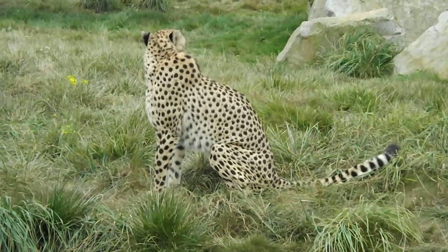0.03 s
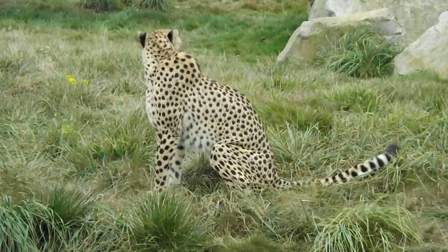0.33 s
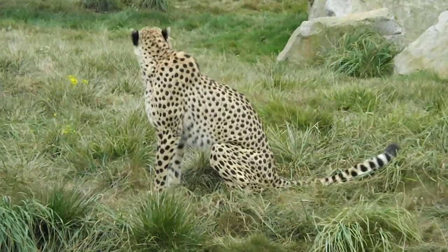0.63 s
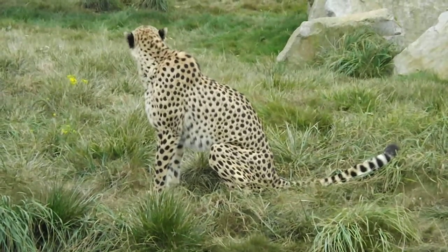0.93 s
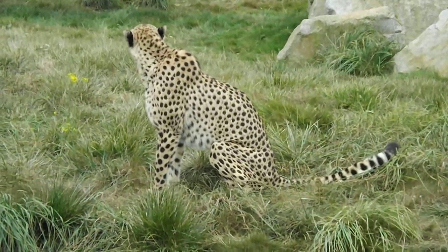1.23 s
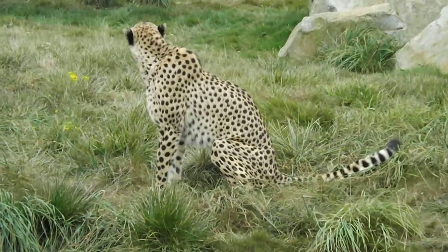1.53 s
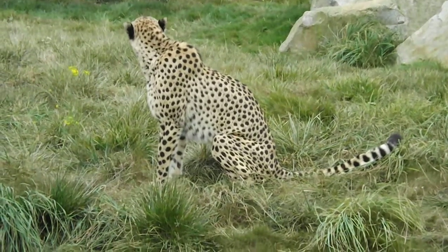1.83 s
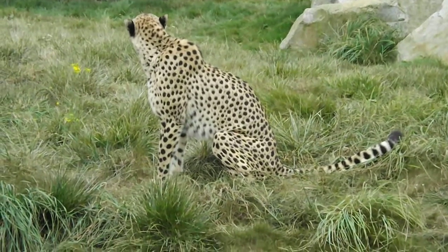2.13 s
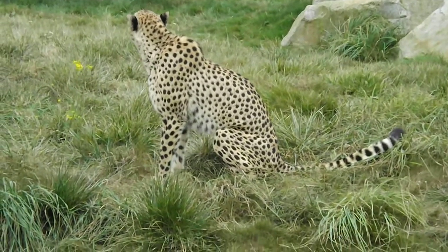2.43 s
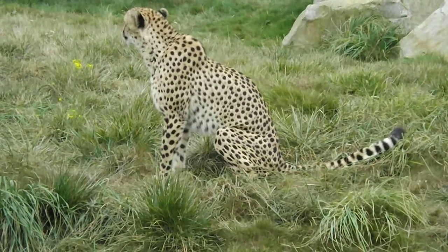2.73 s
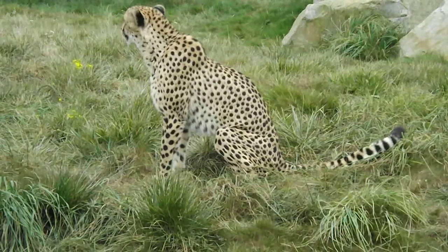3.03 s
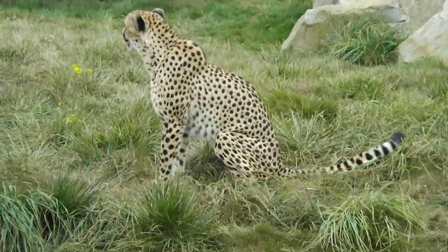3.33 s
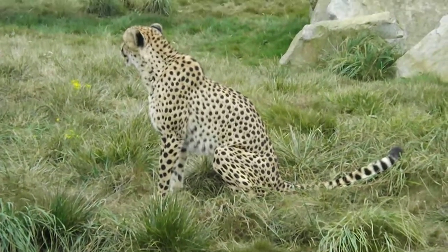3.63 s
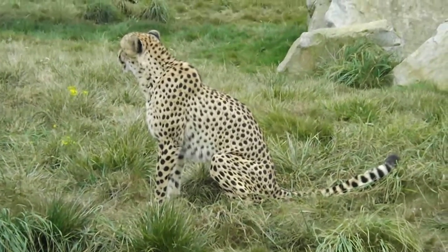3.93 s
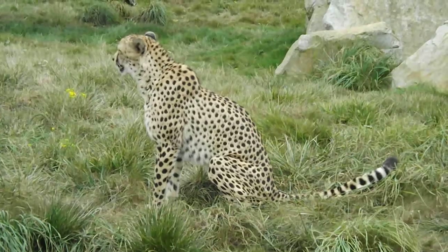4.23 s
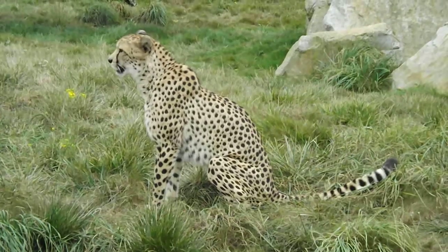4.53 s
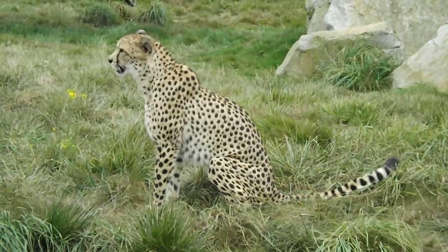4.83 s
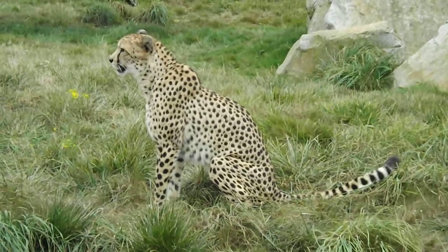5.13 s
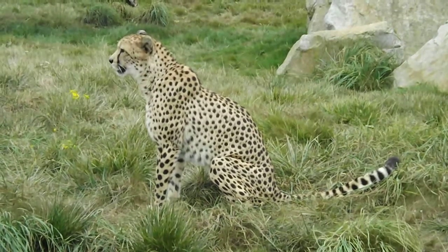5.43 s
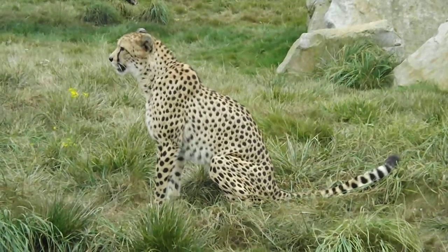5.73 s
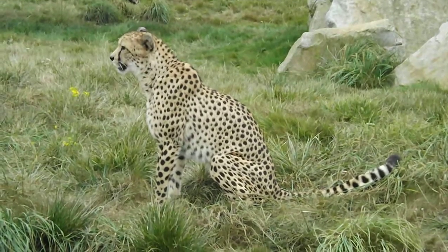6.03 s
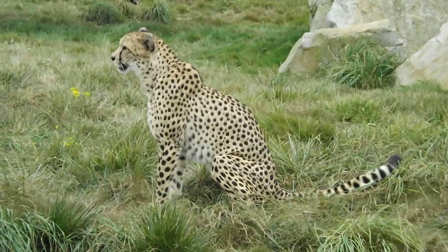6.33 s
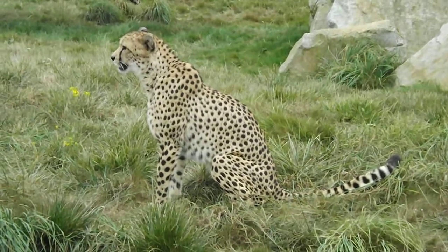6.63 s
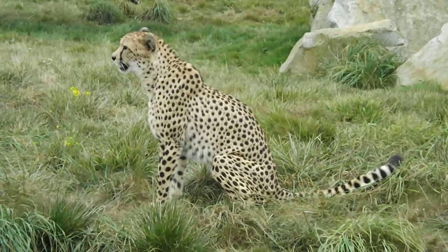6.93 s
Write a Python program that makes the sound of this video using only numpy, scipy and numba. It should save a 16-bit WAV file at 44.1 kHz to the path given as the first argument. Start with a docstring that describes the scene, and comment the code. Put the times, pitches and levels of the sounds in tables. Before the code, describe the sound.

Low wind rumble and irregular buffeting hit the microphone in an open, grassy place. Early on, a cheetah gives a brief chirp that rises and falls in pitch, followed by a hoarser one amid clicking gusts. Both echo lightly off rocks. The wind lulls, then thumps and clicks again, while far birds peep faintly over steady outdoor hiss, leaf rustle and a low drone.

```python
"""Two cheetah chirps, one nearly clean and one raspy, sound through thumping wind in a grassy enclosure.
The cat's vocal folds buzz, its throat and mouth shape the tone, and rocks and walls throw the calls back.
Wind buffets the microphone; its hardest surges trip the recorder's gain control, which clicks as it steps.
Behind it lie a few faint birds, a steady outdoor hiss, rustling leaves, a low drone and a far hum."""
import sys
import numpy as np
from scipy import signal
from scipy.fft import rfft, irfft, next_fast_len
from scipy.io import wavfile
from scipy.ndimage import uniform_filter1d, map_coordinates
from numba import njit

SR = 44100
rng = np.random.default_rng(int(sys.argv[2]) if len(sys.argv) > 2 else 0)


def master_out(mix):
    """Clip the mix to full scale and print it as 16-bit PCM to the path in sys.argv[1]."""
    frames = np.transpose(np.atleast_2d(mix))
    ceiling = np.clip(frames, -1, 1)
    pcm = np.round(ceiling * 32767).astype(np.int16)
    wavfile.write(sys.argv[1], SR, pcm)


N = 311787

# the slow rise and fall of the wind: t/s, rumble level/dB
BREEZE = [(0, -19), (.12, -14.5), (.27, -26.5), (.7, -16.5), (1.15, -24.5), (1.52, -23), (1.64, -15.5),
          (2.1, -20), (2.85, -20), (3.19, -12), (3.4, -25.5), (3.75, -24), (3.9, -43.5), (4.41, -34),
          (4.56, -16.5), (4.92, -25), (5.2, -13), (5.7, -22), (6.1, -14.5), (6.45, -26), (7.07, -34.5)]
MODERATE_BREEZE_DB = -11.5


def cheetah():
    """The cat calls twice: a nearly clean chirp, then a raspier one."""
    # each call: t/s, length/s, rise time/s, start f/Hz, top f/Hz, end f/Hz, roughness (0 to 1)
    calls = [(0.574, .146, .06, 612, 709, 622, .36), (2.325, .185, .059, 612, 731, 500, 1)]
    # the mouth in each call: level/dB, opening push/dB, widest after/s, gain when widest/dB, brightness/dB
    mouths = [(-33, 3, 0.1, 5.5, 2.5), (-30.5, 8, 0.093, 6, -0.5)]
    return sum(chirp(*call, *mouth) for call, mouth in zip(calls, mouths))


def chirp(start, length, rise, start_hz, top_hz, end_hz, rough,
          level_db, push_db, widest_s, gape_db, bright_db, shut_s=0.128):
    """Vocal folds buzz up and down in pitch; the throat colours the tone as the mouth opens and shuts."""
    # how well throat and mouth pass each frequency: f/Hz, gain/dB
    throat = [(500, -13.5), (700, -5.5), (1000, 3.5), (1230, -1), (1320, 2.5), (1460, -1.5), (1650, -6),
              (1900, -18), (2080, -12.5), (2250, -15.5), (2520, -13), (2800, -8), (2950, -11.5),
              (3250, -14.5), (3550, -13), (3850, -40), (4200, -30), (4500, -41), (4850, -23.5), (5200, -33),
              (5650, -41), (6000, -59)]
    # the hiss of breath: f/Hz, level/dB per Hz
    breath_spectrum = [(500, -26), (2300, -21), (2850, 3), (3020, -17), (3330, -13), (3600, -7),
                       (3800, -33), (5000, -26), (7000, -38)]
    since_start = clock() - start
    calling = (since_start > 0) & (since_start < length)
    t = since_start[calling]
    envelope = amp(level_db) * ease(t / 0.014) ** 2 * ease((length - t) / 0.026)
    opening_db = push_db * bump(t, 0.018, 0.016)
    gape = bump(t, widest_s, 0.044)  # how wide the mouth is open
    shut = ease((t - shut_s) / 0.013)
    hoarse = rough * bump(t, 0.103, 0.045)  # the voice turns hoarse as its pitch falls

    def stumble():
        """The random unevenness of hoarse vocal folds."""
        return hoarse * wobble(70, t)

    pitch = start_hz + (top_hz - start_hz) * ease(t / rise)
    pitch += (end_hz - top_hz) * ease((t - rise) / (length - rise))
    jitter = 0.0065 * rough * (0.2 + gape) * wobble(413, t)
    pitch *= 1 + jitter + 0.011 * stumble()
    phase = 2 * np.pi * np.cumsum(pitch) / SR
    # the lowest tone swells at the top pitch, cracks if the call is rough, and ends as a soft hum
    swell_db = 6.5 * bump(t, 0.066, 0.02)
    crack_db = -9 * rough * bump(t, shut_s, 0.014) + 1.6 * stumble()
    voice = amp(along(throat, pitch) + swell_db + crack_db + 5 * shut) * np.sin(phase)
    for k in range(2, 9):  # overtones, at k times the pitch
        shimmer_db = 1.7 * rough * (0.18 + gape) * wobble(221, t)
        flutter_db = min(k, 4) / 2 * (shimmer_db + 1.6 * stumble())
        flutter_db += 1.6 * wobble(70, t)  # even a clear voice flickers
        mouth_db = gape_db * gape - 29 * shut + bright_db * (k > 2)
        # the top overtones escape only while the mouth is wide and the voice clear
        mouth_db -= 12 * (1 - gape + hoarse / 2) * (k > 5)
        voice += amp(along(throat, k * pitch) + opening_db + flutter_db + mouth_db) * np.sin(k * phase)
        # every second beat of hoarse folds is weaker, which adds tones halfway between the overtones
        halfway_db = -21 + k + along(throat, (k + 0.5) * pitch) + mouth_db
        voice += amp(halfway_db) * stumble() * np.sin((k + 0.5) * phase)
    puffs = 1 + np.cos(phase) / 2  # air hisses through the folds once a cycle
    rasp = amp(-8.5) * hoarse * noise(breath_spectrum)[calling] * puffs
    out = np.zeros(N)
    out[calling] = envelope * (np.sqrt(2) * voice + rasp)
    return out


def enclosure(sound, tail_db=-16):
    """Rocks and walls return a few echoes, smeared by their rough faces, over a soft fading tail."""
    # each echo: delay/s, level/dB, smear time/s
    echoes = [(.028, -11.5, 0.0044), (0.049, -16.5, 0.0079), (.158, -16.5, 0.013)]
    # how long the tail rings: f/Hz, time to fade by 60 dB/s
    fade_times = [(500, 0.58), (1400, 0.86), (3000, 1), (6000, 0.29)]
    # calls aimed at the rocks return brighter: f/Hz, gain/dB
    echo_colour = [(600, -6.5), (1280, -3.5), (1440, -2), (2150, 2), (2650, -1.5), (2880, 7), (3200, 0),
                   (3550, 6), (4300, 7.5), (4850, -5), (5300, 0), (6000, -4)]
    hz, t, bands = signal.stft(rng.standard_normal(SR), SR, nperseg=256)
    fade = amp(-60 * t / along(fade_times, hz)[:, None])
    build_up = 1 - np.exp(-t / 0.011)
    tail = signal.istft(bands * fade * build_up, SR, nperseg=256)[1]
    response = amp(tail_db) * tail / np.linalg.norm(tail)
    t = np.arange(SR // 4) / SR
    for delay, db, smear_s in echoes:
        smear = rng.standard_normal(len(t)) * np.exp(-t / smear_s)
        response[int(delay * SR):][:len(t)] += amp(db) * smear / np.linalg.norm(smear)
    reflected = signal.fftconvolve(sound, response)[:N]
    return filtered(reflected, lambda hz: amp(along(echo_colour, hz)))


def wind(heave_db=3.0, ragged_db=3.2):
    """Air swirls on the microphone: the breeze mostly rumbles; gusts add buffets and small fast eddies."""
    # deep rumble, low buffeting and higher eddies (small whirls of air), each: f/Hz, level/dB per Hz
    rumble_spectrum = [(8, -12), (20, 1.5), (32, -12), (48, -7.5), (65, -22), (100, -29), (250, -105),
                       (500, -120)]
    buffet_spectrum = [(35, -20), (62, -2), (85, -2), (120, -6.5), (155, -19), (220, -30), (500, -61),
                       (1500, -110)]
    eddy_spectrum = [(90, -22), (155, 6.5), (205, -2), (260, -8), (340, -18.5), (480, -29), (700, -37),
                     (1200, -49), (3000, -104.5)]
    # gusts that hit the microphone: t/s, half width/s, buffet level/dB, eddy level/dB
    gusts = [(0.436, 0.014, -28.5, -64), (0.72, 0.043, -25.5, -43), (.785, 0.0081, -22, -43),
             (.96, 0.03, -25.5, -45), (1.314, 0.055, -24, -54), (1.419, 0.061, -23.5, -61),
             (1.661, 0.025, -17.5, -23.5), (1.723, 0.011, -17, -23.5), (1.827, 0.012, -29, -5.5),
             (1.869, 0.072, -8.5, -14), (1.985, 0.032, -9.5, -25.5), (2.121, 0.05, -18, -30),
             (2.211, 0.025, -19, -25), (2.359, 0.049, -12.5, -22.5), (2.474, 0.038, -20, -33),
             (2.646, 0.099, -22, -32.5), (2.718, 0.036, -16, -28), (2.86, 0.013, -21.5, -46),
             (2.966, 0.026, -15, -25), (3.055, 0.015, -17.5, -39), (3.109, 0.0097, -11.5, -16),
             (3.401, 0.035, -26.5, -34.5), (4.58, 0.032, -16, -28), (4.764, 0.017, -25, -32.5),
             (5.175, 0.066, -16.5, -32), (5.301, 0.032, -4.5, -22.5), (5.348, 0.03, -24, -18),
             (5.555, 0.078, -14.5, -21.5), (5.712, 0.04, -17, -26.5), (5.788, 0.028, -18, -29),
             (5.855, 0.0074, -17, -22.5), (5.909, 0.026, -7, -22), (6.07, 0.024, -14, -27),
             (6.2, .05, -36, -43), (6.569, 0.02, -21.5, -48), (6.3, 0.05, -17, -28),
             (6.652, 0.029, -17, -19.5), (6.72, 0.029, -19.5, -34)]
    t = clock()
    breeze_db, = curves(BREEZE, t)
    above_moderate_db = breeze_db - MODERATE_BREEZE_DB
    breeze_buffet = amp(-41.5 + 0.43 * above_moderate_db)
    breeze_eddies = amp(-55.5 + 0.094 * above_moderate_db)
    gust_buffet = np.sqrt(sum((amp(db) * bump(t, s, width)) ** 2 for s, width, db, _ in gusts))
    gust_eddies = np.sqrt(sum((amp(db) * bump(t, s, width)) ** 2 for s, width, _, db in gusts))
    rumble = np.hypot(amp(breeze_db), amp(3) * gust_buffet) * even(noise(rumble_spectrum), 0.16)
    buffet = np.hypot(breeze_buffet, gust_buffet) * even(noise(buffet_spectrum), 0.077)
    eddies = np.hypot(breeze_eddies, gust_eddies) * even(noise(eddy_spectrum), 0.039)
    rumble *= amp(heave_db * wobble(12, t))
    eddies *= amp(ragged_db * wobble(110, t))
    flow = saturate(rumble, 0.45) + buffet + eddies + thumps(t)
    return add_surges(saturate(flow, 0.68), t)


def thumps(t):
    """A lone eddy gives one push and pull as it crosses the microphone's opening: a dull thump."""
    # each eddy: t/s, half width/s, peak level/dB
    lone_eddies = [(.715, 0.0027, -18.5), (1.306, 0.003, -5), (1.606, 0.0054, -8), (1.706, 0.0027, -10),
                   (1.8239, 0.002, -2), (1.916, 0.005, -4), (2.226, 0.0024, -12.5), (2.648, 0.004, -5),
                   (2.969, 0.0032, -8.5), (3.002, 0.0029, -10), (3.17, 0.0092, -4.5), (3.229, 0.007, -4),
                   (4.591, .0025, -19.5), (4.623, 0.0022, -15), (4.666, 0.0047, -9.5),
                   (4.767, 0.004, -13.5), (5.087, 0.0024, -17.5), (5.117, 0.0012, -20.5),
                   (5.554, 0.0018, -12), (5.848, 0.0026, -11), (6.058, 0.0017, -15), (6.083, 0.0022, -5),
                   (6.13, 0.0031, -19.5), (6.292, 0.0035, -8.5), (6.333, 0.0052, -13),
                   (6.651, 0.0024, -7.5), (6.668, 0.0027, -8.5)]
    return sum(amp(db) * np.sqrt(2 * np.e) * (t - s) / width * bump(t, s, width)
               for s, width, db in lone_eddies)


def add_surges(flow, t, same_way_s=0.007):
    """Large eddies briefly take over the pressure at the microphone, pushing and pulling in turn."""
    # surges: the strong ones overload and click; weaker ones meet the gain control's steps back up, which tick:
    # t/s, pressure (1 = full scale), half width/s
    surges = [(1.7900, .87, .004), (1.8368, 1.05, .0035), (1.8764, 1.22, .004), (1.9084, .55, .005),
              (1.9714, .97, .004), (2.0034, .85, .005), (2.3653, .97, .002), (3.1100, .86, .004),
              (4.5590, .86, .005), (5.1568, .86, .006), (5.1855, 1.15, .004), (5.2165, .6, .008),
              (5.2880, 1.06, .004), (5.2982, 1.47, .0035), (5.4253, .75, .005), (5.5904, .88, .0035),
              (5.5995, 1.21, .0035), (5.9078, .92, .003), (5.9118, 1.24, .0025), (5.9748, .7, .006),
              (6.0068, .65, .006), (6.0388, .5, .005), (6.2756, .91, .005)]
    gaps = np.diff([row[0] for row in surges], prepend=0)
    directions = (-1) ** np.cumsum(gaps > same_way_s)  # very close surges push the same way
    for direction, (s, pressure, width) in zip(directions, surges):
        near = slice(int((s - 4 * width) * SR), int((s + 4 * width) * SR))
        flow[near] += bump(t[near], s, width) * (direction * pressure - flow[near])
    return flow


def birds(length_s=0.037, pitch_fall=0.083):
    """Far birds give short whistles that waver and fall in pitch."""
    # each peep: middle t/s, start f/Hz, level/dB
    peeps = [(3.054, 4300, -53), (3.18, 3110, -54), (3.73, 5600, -63), (4.099, 4350, -53),
             (5.44, 4150, -53), (5.464, 3250, -47), (5.722, 4270, -53), (5.741, 3430, -43.5)]
    out, size = np.zeros(N), int(length_s * SR)
    t = np.arange(size) / SR
    for s, start_hz, db in peeps:
        pitch = start_hz * (1 - pitch_fall * t / length_s) * (1 + 0.036 * wobble(202, t))
        peep = amp(db) * np.sqrt(2) * np.hanning(size) * tone(pitch)
        out[int((s - length_s / 2) * SR):][:size] += peep
    return out


def background(air_db=-48.0, leaves_db=-53.5, drone_db=-60, hum_db=-54.5, hum_hz=495):
    """Air hisses and leaves rustle, a touch louder in the breeze; far off lie a drone and a brief hum."""
    # outdoor air, rustling leaves and the low drone, each: f/Hz, level/dB per Hz
    air_spectrum = [(240, -5.5), (400, -5), (504, -9), (545, -7.5), (655, -11.5), (708, -8.5), (765, -10.5),
                    (1290, -4), (1730, -10.5), (1870, -7), (2670, -11), (3310, -3.5), (4400, -15.5),
                    (5500, -23.5), (10000, -26.5), (16000, -28)]
    leaf_spectrum = [(2200, -13.5), (2800, -5.5), (3250, 4), (3550, -2), (3900, -51), (5000, -26)]
    drone_spectrum = [(60, -64), (150, 15.5), (300, 14), (420, -26), (600, -21), (1000, -56)]
    t = clock()
    stir_db = 0.016 * (curves(BREEZE, t)[0] - MODERATE_BREEZE_DB)
    air = amp(air_db + 0.054 * wobble(1.7, t)) * noise(air_spectrum)
    leaves = amp(leaves_db + 1.1 * wobble(14, t)) * noise(leaf_spectrum)
    hum_pitch = hum_hz * (1 + 0.0143 * wobble(24, t))
    hum = amp(hum_db) * bump(t, centre=6.97, width=0.1) * tone(hum_pitch)
    drone = amp(drone_db) * noise(drone_spectrum)
    return amp(stir_db) * (air + leaves) + drone + hum


def amp(db):
    """Turn decibels into a number to multiply by."""
    return 10 ** (np.asarray(db) / 20)


def unit(x):
    """Scale a sound to an average power of 1."""
    return x / np.sqrt(np.mean(x ** 2) + 1e-20)


def along(points, hz):
    """Read a table of (f/Hz, value) between its points, with octaves evenly spaced."""
    frequencies, values = np.transpose(points)
    return np.interp(np.log(hz + 1), np.log(frequencies + 1), values)


def clock():
    """The time of each sample in seconds."""
    return np.arange(N) / SR


def curves(rows, t):
    """Read each column after the time column at times t."""
    times, *columns = np.transpose(rows)
    return [np.interp(t, times, column) for column in columns]


def bump(t, centre, width):
    """A bell-shaped swell of height 1."""
    return np.exp(-((t - centre) / width) ** 2)


def ease(u):
    """A smooth step from 0 to 1 as u goes from 0 to 1."""
    return (1 - np.cos(np.pi * np.clip(u, 0, 1))) / 2


def wobble(rate, t):
    """A smooth curve through random points, `rate` of them a second."""
    position = (t - t[0]) * rate
    return map_coordinates(rng.standard_normal(int(position[-1]) + 4), [position])


def tone(pitch):
    """A pure tone that follows a changing pitch in Hz."""
    return np.sin(2 * np.pi * np.cumsum(pitch) / SR)


def filtered(x, response):
    """Turn each frequency up or down by the gain response(hz)."""
    size = next_fast_len(N + SR // 2)
    return irfft(rfft(x, size) * response(np.fft.rfftfreq(size, 1 / SR)), size)[..., :N]


def noise(spectrum):
    """Noise of average power 1, coloured by a table of (f/Hz, level/dB)."""
    return unit(filtered(rng.standard_normal(N), lambda hz: amp(along(spectrum, hz))))


def even(x, seconds):
    """Flatten the swells that are slower than the given time."""
    power = uniform_filter1d(np.abs(signal.hilbert(x)) ** 2, max(int(seconds * SR), 1))
    return unit(x / np.sqrt(np.abs(power) + 1e-9))


def saturate(x, top):
    """Round off the peaks so they stay below the top."""
    return x / (1 + (x / top) ** 4) ** (1 / 4)


@njit
def gain_control(x, ceiling, drop_db, recovery_share, hold_s, creep_db_per_s):
    """The recorder turns down at each overload, then creeps and steps back up; the jumps click."""
    hold = int(hold_s * SR)
    out, cut_db, wait = np.zeros(len(x)), 0., hold
    for i in range(len(x)):
        wait -= 1
        cut_db = max(cut_db - creep_db_per_s / SR, 0.)
        if abs(x[i]) * 10 ** (-cut_db / 20) > ceiling:
            cut_db, wait = cut_db + drop_db, hold
        elif wait == 0:
            cut_db, wait = cut_db * (1 - recovery_share), hold
        out[i] = x[i] * 10 ** (-cut_db / 20)
    return out


def scene(bird_echo_db=-1):
    """All sources meet at one microphone, which feeds both channels."""
    calls, peeps = cheetah(), birds()
    echoes = enclosure(calls + amp(bird_echo_db) * peeps)
    sound = calls + peeps + echoes + wind() + background()
    return np.array([sound, sound])


def record(dry, top_hz=16000):
    """The recorder steps its gain, delays the left channel by one sample and cuts the highest treble."""
    left, right = [gain_control(channel, ceiling=0.8, drop_db=2.85, recovery_share=0.255,
                                hold_s=0.032, creep_db_per_s=5) for channel in dry]
    late_left = np.pad(left, (1, 0))[:N]
    return filtered(np.array([late_left, right]), lambda hz: hz < top_hz)


dry = scene()
out = record(dry)
master_out(out)
```